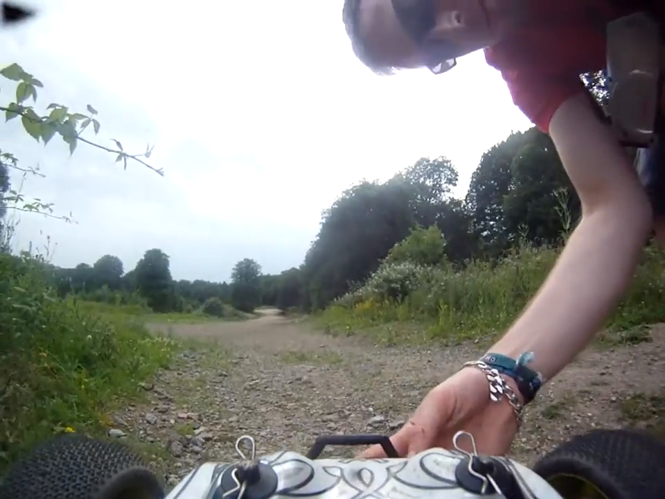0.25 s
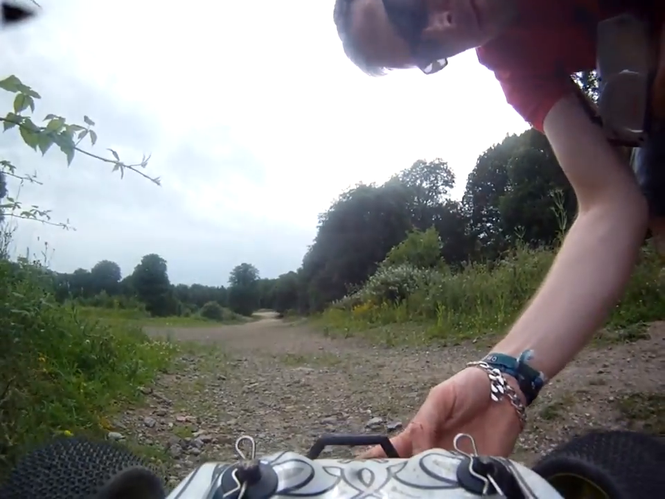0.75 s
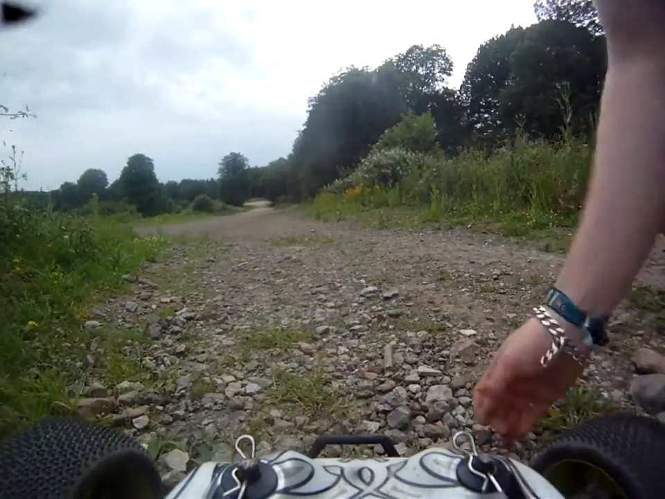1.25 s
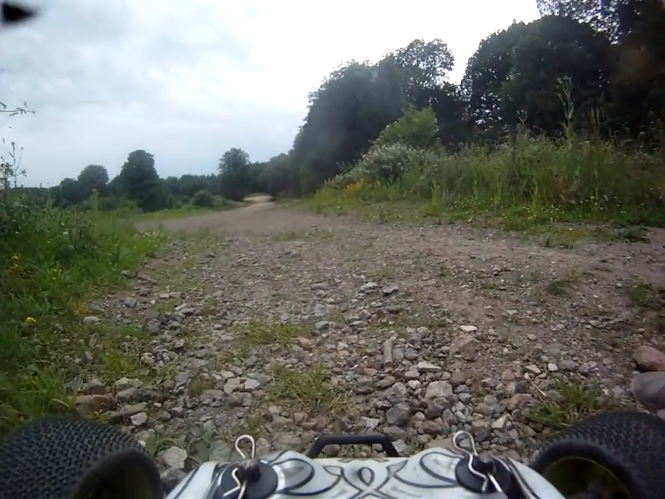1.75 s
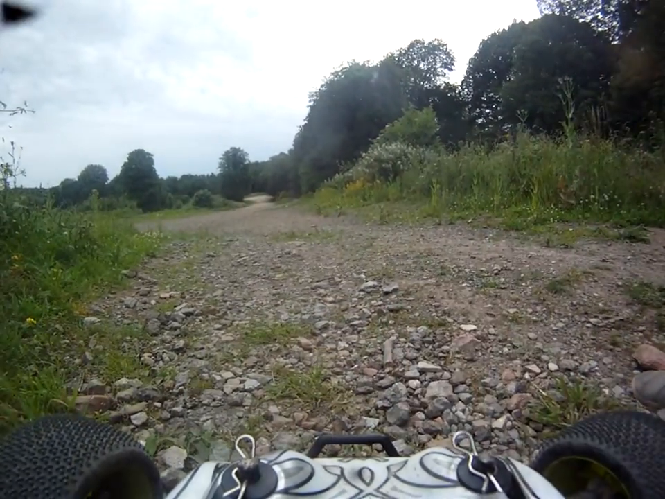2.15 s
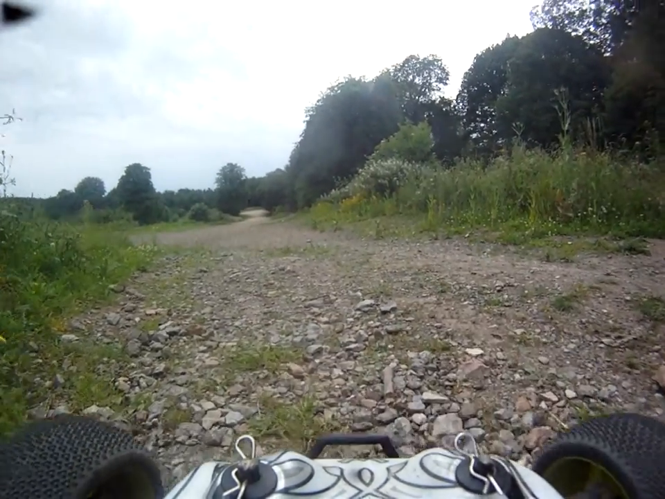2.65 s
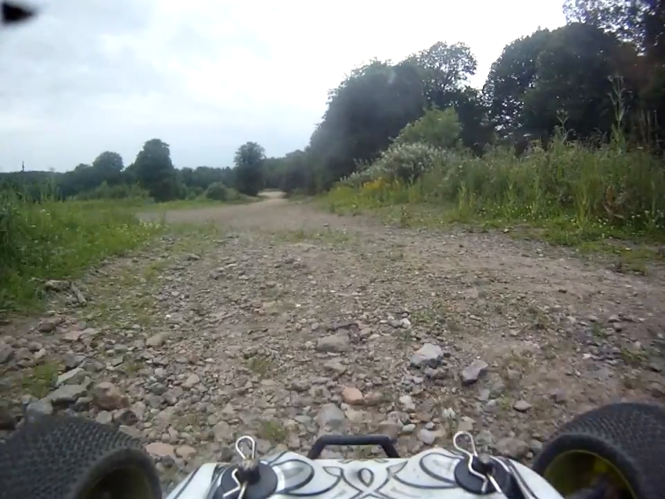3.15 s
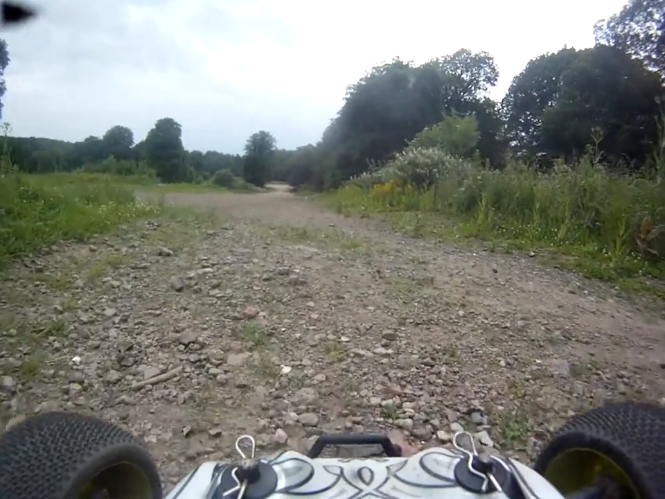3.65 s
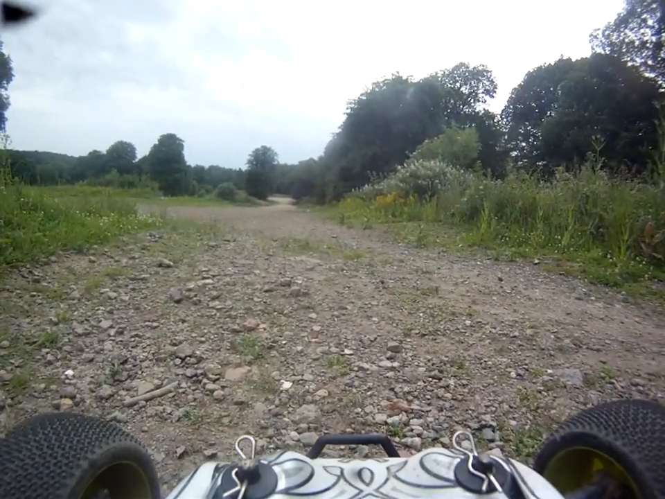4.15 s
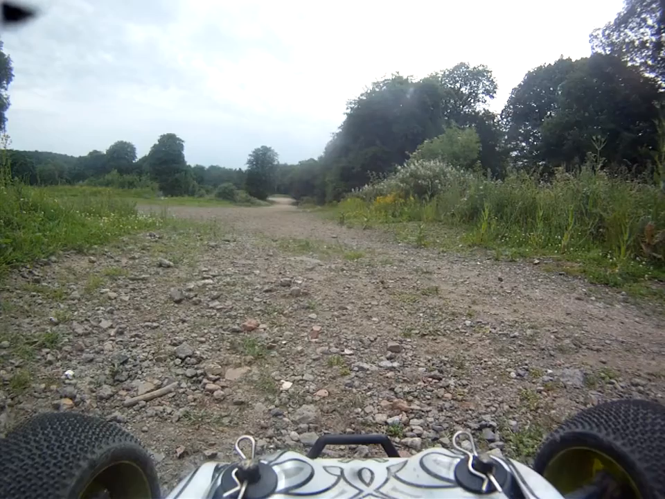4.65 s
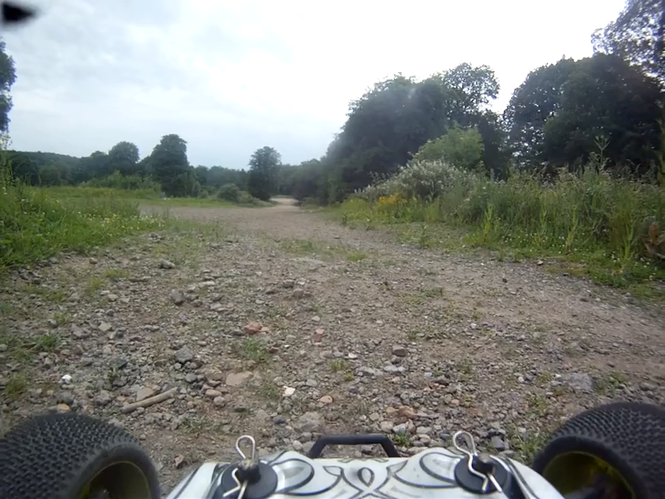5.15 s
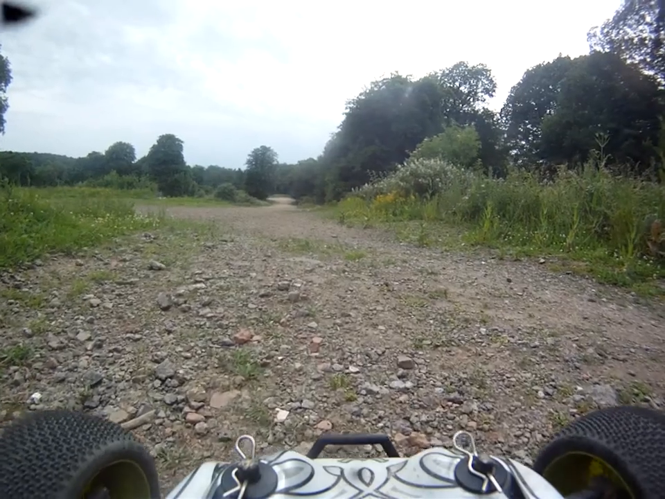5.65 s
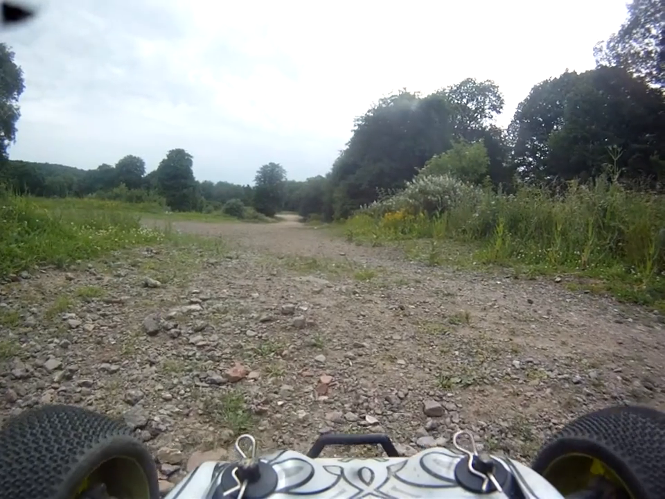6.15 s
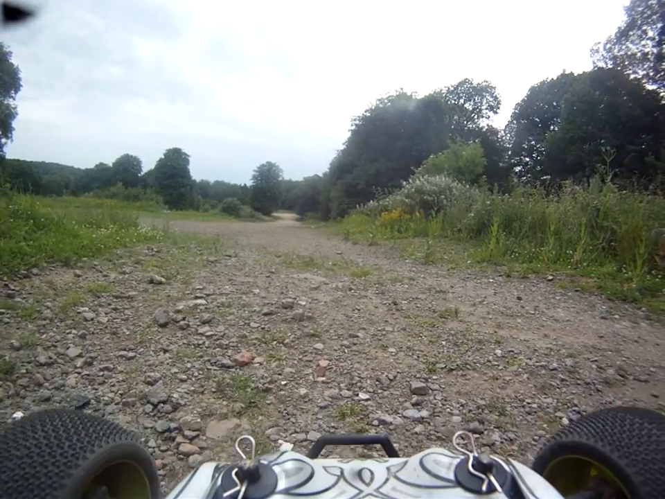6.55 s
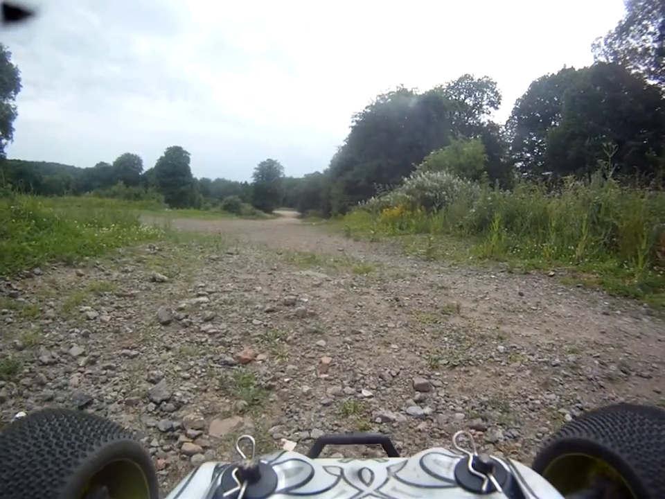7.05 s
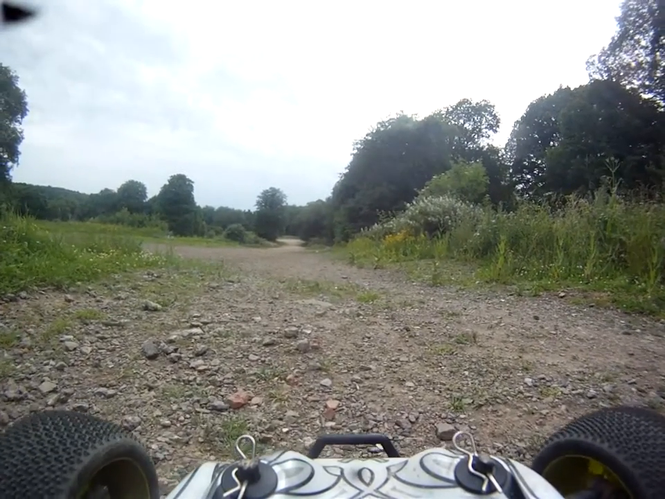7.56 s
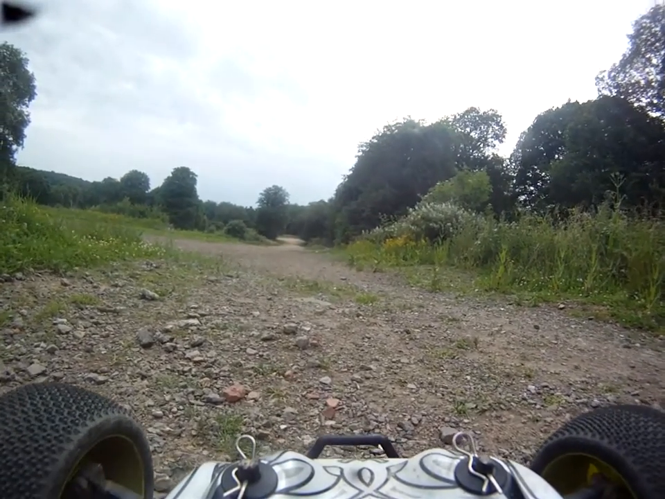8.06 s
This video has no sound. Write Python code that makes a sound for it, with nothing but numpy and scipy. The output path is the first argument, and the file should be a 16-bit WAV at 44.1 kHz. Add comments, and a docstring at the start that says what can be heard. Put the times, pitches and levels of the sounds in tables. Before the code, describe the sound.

A tiny two-stroke engine idles unevenly up close, its firings thudding over a rattling buzz. It revs briefly and stalls with a loud knock. The model buggy then rolls over gravel with a burst of crunching, quietens almost to nothing while a motor drones faintly far off, and later knocks and bumps over stones again. The microphone rides on the buggy in a closed case, so everything sounds muffled and boxy outdoors.

```python
"""A small two-stroke buzzes at idle, blips and stalls with a loud knock; gravel then crunches and knocks.
The engine is a crank-driven sine with rattling noise; gravel is grainy noise, knocks and scrapes in the case.
The microphone rides on the model buggy, in a camera in a closed case: engine, tyres and frame are close.
The chassis shudders and thumps in its low modes, and the camera mount sways as a decaying low sine.
Far off, a motor drones in a few thin partials."""
import sys
import numpy as np
from scipy import signal
from scipy.io import wavfile
from scipy.ndimage import uniform_filter1d

SR = 44100
rng = np.random.default_rng(int(sys.argv[2]) if len(sys.argv) > 2 else 0)


def wav_out(sig):
    """Save sig, one row per channel (or a flat mono array), as 16-bit PCM at SR to the path in sys.argv[1]."""
    wavfile.write(sys.argv[1], SR, np.round(np.clip(np.atleast_2d(sig).T, -1, 1) * 32767).astype(np.int16))


def level_to_linear(level):
    """Convert decibel levels to linear amplitude factors, elementwise."""
    exponent = np.asarray(level, float) / 20
    return 10 ** exponent


N = 366471
TIME = np.arange(N) / SR  # [s]

# Engine run: (time [s], crank speed before surges [Hz], steady shake [dB], rattle [dB])
ENGINE_RUN = [(0, 109, -25, -18), (.4, 103, -25, -17.5), (1.2, 102, -25, -18.5), (2.1, 102, -25, -18.5),
              (2.58, 103, -25, -19), (2.635, 128, -20, -17), (2.665, 185, -22, -15), (2.71, 188, -27, -14),
              (2.76, 170, -14, -15.5), (2.87, 148, -15, -17), (2.9, 125, -19, -20), (2.93, 109, -15, -21),
              (2.955, 98, -28, -25)]
# Overtones of the shake: (multiple of crank speed, level against the first at a 105 Hz crank [dB])
SHAKE_OVERTONES = [(2, -31), (3, -35), (4, -39)]
# Strongest firings at idle: (time [s], peak shake [dB])
STRONG_FIRINGS = [(0.012, -10), (.118, -7.5), (0.205, -8.5), (.343, -8.5), (.415, -6.5), (0.58, -9),
                  (.666, -8.5), (.764, -8), (1.022, -8.5), (1.097, -9), (1.219, -7.5), (1.348, -9),
                  (1.449, -8.5), (1.593, -9), (1.727, -8), (1.8, -7.5), (1.91, -8.5), (2.006, -7.5),
                  (2.116, -9), (2.249, -9), (2.35, -9.5), (2.428, -8.5), (2.481, -9), (2.535, -8),
                  (2.641, -11)]
FIRING_GAP_S, FIRING_JITTER_S = .035, .006  # ordinary firings: usual wait, timing scatter
FIRING_DB, FIRING_SCATTER_DB = -11, 2
# Resonances of the closed case: (centre [Hz], width [Hz], gain [dB], crank turn of the loudest rattle [turns])
CASE_MODES = [(724.7, 31, 0.5, 0.47), (809.3, 149, 3.5, 1), (1080, 123, 4, 0.053), (1159.7, 170, 5.5, 0.14),
              (1429, 372, 2, 0.13), (1644, 325, 2.5, 0.76), (1980, 156, 5.5, 0.45), (2210, 171, 6, 0.8),
              (1500, 167, -11, 0.99), (2860, 420, -16.5, 1), (3560, 240, -9.5, 0.65),
              (4970, 150, -23.5, 0.89), (5135, 960, -21.5, 0.87)]
CASE_LEAK_HZ, CASE_LEAK_WIDTH_HZ, CASE_LEAK_DB = 384, 356, -11.5  # broad low leak
CASE_TREBLE_DB = -18.5  # taken off the treble column of the knocks
# Low modes of the frame: (centre [Hz], width [Hz], gain [dB])
CHASSIS_MODES = [(64.5, 22, 7.5), (110.2, 41, 11.5), (189, 190, -60), (460, 80, -26.5)]
# Rolling on gravel: (time [s], crunch [dB], crunch treble [dB], chassis shudder [dB])
ROLLING = [(2.97, -51, -80, -46), (3.21, -33, -52, -37.5), (3.43, -25.5, -48, -24.5),
           (3.71, -37.5, -63, -32.5), (4.04, -50.5, -65.5, -46.5), (4.26, -63, -64, -58),
           (4.77, -55, -61.5, -61), (5.02, -51.5, -57.5, -51.5), (5.29, -48, -64, -50),
           (5.63, -42.5, -57.5, -46), (5.93, -37, -64, -31.5), (6.06, -37, -56, -38.5),
           (6.26, -41.5, -54.5, -45), (6.49, -39, -51.5, -47), (6.75, -39, -53, -42.5),
           (6.9, -35, -47, -28.5), (7.06, -43, -66, -37.5), (7.36, -41, -73, -33), (7.59, -32, -48, -34.5),
           (7.83, -35.5, -46, -38), (8.03, -42.5, -59, -52), (8.31, -34.5, -53, -34)]
TREAD_HZ, TREAD_WIDTH_HZ, TREAD_DB = 450, 480, -15  # dull tyre patter, against the crunch
JUDDER_HZ, JUDDER_WIDTH_HZ, JUDDER_DB = 42, 32, -7  # suspension, against the shudder
RING_DB = -8  # main frame mode, against the shudder
RING_WANDER_DB, RING_WANDER_HZ = 5, 7.8  # dB per unit of a random curve, new values of it per second
# Knocks, the first as the engine stalls, the others from stones: (time [s], peak of the buzz [dB], colour [Hz],
# decay T60, held within 0.008 to 0.2 [s], treble gain before CASE_TREBLE_DB is taken off [dB])
KNOCK_LIST = [(2.958, 12.5, 1080, 0.023, -9), (3.2, -20, 980, .11, -30), (3.304, -22, 1480, 0.053, -27),
              (3.412, -10.5, 1520, 0.03, -39), (3.5, -6.5, 1530, 0.03, -1.5), (3.691, -21, 816, 0.059, -34),
              (3.817, -10, 1180, 0.14, -29), (4.011, -30, 1240, 0.064, -33), (4.9, -31, 1080, 0.13, -12),
              (5.037, -30.5, 1940, .08, -12), (5.741, 7.5, 1770, 0.0099, -22),
              (5.914, -24, 1270, 0.067, -31), (5.959, -3.5, 1640, 0.044, -17.5),
              (6.061, -15, 1560, 0.026, -32), (6.107, -9.5, 1630, 0.069, -17),
              (6.136, -14, 2600, 0.24, -24), (6.321, -28.5, 1100, 0.064, 6), (6.834, -3.5, 1960, 0.05, -11),
              (6.872, -7, 2060, .047, -20), (6.908, -22.5, 1070, 0.058, -33),
              (6.962, -16.5, 980, 0.12, -18.5), (7.007, -4.5, 1820, .074, -51),
              (7.029, -18, 1900, 0.045, -2), (7.078, -24.5, 1780, 0.072, -29), (7.254, 9, 1080, 0.02, -13),
              (7.383, -8.5, 1330, 0.1, -16), (7.392, 1.5, 2210, 0.03, -39), (7.473, -5, 2400, 0.082, -23.5),
              (7.494, -7, 1055, 0.09, -17), (7.527, 6, 1880, 0.0095, -23), (7.563, -8, 1920, 0.033, -24),
              (7.654, -19, 1120, 0.18, -21), (7.728, -3.5, 2270, 0.049, -10.5),
              (7.801, -22, 1120, 0.042, -25), (7.883, -22.5, 2280, 0.075, -11),
              (8.034, -12, 1656, 0.089, -15), (8.169, -27, 2210, 0.067, -25.5), (8.29, -9, 1670, 0.13, -16)]
KNOCK_THUMP_DB = -29.5  # push on the frame, against the knock
SHELL_HZ, SHELL_T60_S, SHELL_DB = 444, 0.063, -25.5  # body shell note, against the knock
SHELL_GROWS = 0.31  # extra dB per dB of knock
FRAME_RING_HZ, FRAME_RING_T60_S, FRAME_RING_DB = 120, 0.49, -32  # level after a 0 dB knock
FRAME_RING_GROWS = 0.56  # dB per dB of knock
# Stones scraping along the frame: (centre time [s], length [s], level [dB], colour [Hz], treble gain [dB])
STONE_SCRAPES = [(2.974, 0.086, -26, 1500, -1.5), (3.315, 0.066, -26.5, 1550, 0),
                 (3.439, 0.022, -22.5, 1500, -5), (3.546, 0.07, -19.5, 1870, 2),
                 (3.649, 0.027, -28.5, 1220, 2), (3.889, 0.053, -37.5, 2020, 10),
                 (4.263, 0.055, -38.5, 2200, 1.5), (4.43, 0.052, -50, 2100, 5),
                 (4.779, 0.028, -46.5, 2000, -1), (5.056, .03, -44, 1950, 4),
                 (5.133, 0.13, -43.5, 1690, -10), (5.503, 0.1, -42, 2100, 14),
                 (5.76, 0.035, -18, 1880, -31), (5.972, 0.03, -30, 1870, -17),
                 (6.243, 0.04, -33.5, 2200, 3), (6.819, 0.075, -26.5, 2040, 9),
                 (6.969, 0.025, -23.5, 1900, 6), (7.033, 0.021, -24, 2010, 10),
                 (7.271, 0.033, -25.5, 2200, -6), (7.517, 0.025, -23, 1960, 3),
                 (7.595, 0.059, -23, 1980, 8.5), (7.67, 0.067, -40, 2200, 18), (7.948, 0.1, -31, 1045, -1),
                 (8.221, 0.08, -25, 1990, 2)]
# Wheels dropping over stones: (time [s], peak frame thump [dB], mount sway before rise and decay [dB], sway [Hz])
WHEEL_BUMPS = [(2.66, -50, -27, 29.23), (2.82, -50, -29, 31.3), (3.039, -37, -28, 26.8),
               (3.199, -21, -14.5, 25), (3.302, -17.5, -12.5, 25.1), (3.412, -29, -20.5, 24.8),
               (3.528, -22, -9.5, 25), (3.693, -23, -12, 26.4), (3.817, -17.5, -18.5, 26.1),
               (4.011, -43.5, -27.5, 26.1), (5.036, -39, -31, 26.2), (5.53, -55, -35.5, 25.8),
               (5.742, -23, -33, 25.6), (5.915, -36, -26, 26.9), (6.06, -24, -23.5, 27.8),
               (6.108, -19, -15, 26.8), (6.479, -43, -26, 26.9), (6.68, -47, -25, 24.84),
               (6.832, -14.5, -30, 24.86), (6.872, -6, -20, 25.2), (6.91, -19, -26, 25.1),
               (7.028, -18.5, -25.5, 24.75), (7.12, -42, -27, 27.6), (7.254, -16, -26.5, 27.6),
               (7.391, -13, -26, 27.6), (7.473, -22, -24, 27.1), (7.494, -15.5, -27, 27.4),
               (7.68, -45, -28, 27.7), (7.8, -20.5, -29, 27.8), (7.93, -45, -28, 28.3),
               (8.036, -3.5, -20.5, 27.1), (8.169, -31, -24, 26.5)]
SWAY_RISE_S, SWAY_T60_S = 0.017, 1
# Far drone: (time [s], pitch [Hz], level before the partials' own [dB])
FAR_DRONE = [(4.05, 134, -68), (4.15, 132, -58), (4.5, 134.5, -56), (4.72, 131.3, -58), (4.9, 135, -57),
             (5.1, 142.5, -54), (5.25, 133, -58), (5.7, 134, -56), (6.25, 139, -52), (6.75, 132, -52),
             (6.85, 131, -62)]
# Partials of the drone: (multiple of pitch, level [dB])
DRONE_PARTIALS = [(1, -9), (4, -16), (5, -14), (6, -12), (7, -17), (8, -.5), (9, -4), (10, -7)]


def unit(x):
    """Scale to rms 1."""
    return x / np.sqrt(np.mean(x ** 2))


def curves(table):
    """Columns of a table at every sample, and a gate that is open while the table runs."""
    times, *columns = np.transpose(table)
    running = (TIME >= times[0]) & (TIME <= times[-1])
    gate = uniform_filter1d(1. * running, size=200)
    return [np.interp(TIME, times, column) for column in columns] + [gate]


def ring(x, hz, width):
    """One resonance, gain 1 at its centre."""
    return signal.lfilter(*signal.iirpeak(hz, hz / width, SR), x)


def steep(x, hz, width):
    """A resonance applied twice: dark skirts."""
    return ring(ring(x, hz, width), hz, width)


def decaying(pulses, length_s):
    """Each pulse dies away exponentially."""
    return signal.lfilter([1], [1, -np.exp(-1 / (length_s * SR))], pulses)


def grit(rate, spread_db, length_s):
    """Noise whose level jumps with scattered grains (rate per second) of very uneven size."""
    sizes = level_to_linear(spread_db * np.minimum(rng.exponential(size=N), 4))
    grains = (rng.random(N) < rate / SR) * sizes
    return rng.standard_normal(N) * decaying(grains, length_s)


def case(x, treble_db=0, colour_hz=1500, colour_db=0, low_db=0):
    """The camera case rings in its modes; a blow can favour those near its colour."""
    out = level_to_linear(CASE_LEAK_DB + low_db) * ring(x, CASE_LEAK_HZ, CASE_LEAK_WIDTH_HZ)
    for hz, width, db, _ in CASE_MODES:
        near = np.exp(-(np.log(hz / colour_hz) / .2) ** 2)
        gain_db = db + colour_db * near + treble_db * (hz > 2700)
        out = out + level_to_linear(gain_db) * steep(x, hz, width)
    return out


def chassis(x):
    """Low modes of the frame."""
    return sum(level_to_linear(db) * ring(x, hz, width) for hz, width, db in CHASSIS_MODES)


def thump():
    """One soft push through the frame, peak 1."""
    push = -chassis(np.exp(-((TIME[:5000] - .004) / 0.001) ** 2))
    return push / np.abs(push).max()


def firings():
    """The strong firings, with ordinary ones of chance size three or four turns apart between them."""
    rows = list(STRONG_FIRINGS)
    chance = rng.standard_normal((len(rows), 12, 2))
    for (start, _), (end, _), draws in zip(STRONG_FIRINGS, STRONG_FIRINGS[1:], chance):
        count = round((end - start) / FIRING_GAP_S)
        for k in range(1, count):
            time = start + (end - start) * k / count + FIRING_JITTER_S * draws[k, 0]
            rows.append((time, FIRING_DB - FIRING_SCATTER_DB * np.clip(draws[k, 1], -1, 3)))
    return rows


def engine():
    """Each good firing, one every few turns, speeds the crank and shakes the frame; loose parts rattle."""
    speed_hz, shake_db, rattle_db, gate = curves(ENGINE_RUN)
    kick = np.max([level_to_linear(db) * np.exp(-((TIME - s) / .016) ** 2) for s, db in firings()], axis=0)
    idling = TIME < STRONG_FIRINGS[-1][0] + .014
    surge = (kick - .2) * idling
    # the crank labours against compression just before it fires
    drag = np.exp(-(kick + .04) / .07) * idling
    waver = unit(ring(rng.standard_normal(N), 30, 40))
    turn = np.cumsum(speed_hz * (1 + 1.1 * surge - .5 * drag + 0.023 * waver)) / SR

    harsh = (speed_hz / 105) ** 3  # overtones grow with speed
    overtones = sum(level_to_linear(db) * np.sin(2 * np.pi * k * turn) for k, db in SHAKE_OVERTONES)
    steady = np.sqrt(2) * level_to_linear(shake_db) * (1 + 0.33 * waver)
    shake = (np.sin(2 * np.pi * turn) + harsh * overtones) * np.hypot(kick, steady)
    # the springs soak up the slowest motion
    shake = signal.sosfilt(signal.butter(2, 70, "high", fs=SR, output="sos"), shake)

    # a sharp tick as the pressure of a firing starts to climb, and one of chance size on every turn
    climb_starts = np.maximum(np.diff(1. * (np.gradient(kick) > 0), prepend=0), 0)
    onset = climb_starts * np.exp(-kick / 0.094)
    stroke = np.diff(np.floor(turn + .4), prepend=0) * 2 * rng.random(N)
    ticks = decaying(3.5 * onset + 1.6 * stroke, .002)
    clatter = 0.21 * unit(grit(600, 4.3, 0.0047)) + rng.standard_normal(N) * (1.03 + ticks)
    rattle = level_to_linear(CASE_LEAK_DB) * ring(clatter, CASE_LEAK_HZ, CASE_LEAK_WIDTH_HZ)
    for hz, width, db, peak in CASE_MODES:
        once_a_turn = 1 + 0.41 * np.cos(2 * np.pi * (turn - peak))
        rattle = rattle + level_to_linear(db) * steep(clatter * once_a_turn, hz, width)
    rumble = level_to_linear(-37) * unit(ring(rng.standard_normal(N), 60, 70))
    return gate * (shake + level_to_linear(rattle_db) * unit(rattle) + rumble)


def rolling():
    """Tyres crush gravel in small grains, duller or brighter; the frame shudders and its main mode rings."""
    crunch_db, treble_db, shudder_db, gate = curves(ROLLING)
    step = int(SR / RING_WANDER_HZ)
    wander = uniform_filter1d(np.repeat(rng.standard_normal(200), step), step)[:N]
    ring_db = shudder_db + RING_DB + RING_WANDER_DB * wander
    crunch = case(1.08 * unit(grit(240, 4.3, 0.0071)) + rng.standard_normal(N))
    treble = signal.sosfiltfilt(signal.butter(4, 2700, "high", fs=SR, output="sos"), crunch)
    shudder = unit(chassis(grit(200, 6.3, 0.0065)))
    hum = unit(steep(rng.standard_normal(N), CHASSIS_MODES[1][0], 21))
    tread = level_to_linear(TREAD_DB) * unit(steep(grit(150, 1.3, 0.015), TREAD_HZ, TREAD_WIDTH_HZ))
    judder = level_to_linear(JUDDER_DB) * unit(steep(rng.standard_normal(N), JUDDER_HZ, JUDDER_WIDTH_HZ))
    gravel = level_to_linear(crunch_db) * (unit(crunch - treble) + tread) + level_to_linear(treble_db) * unit(treble)
    frame = level_to_linear(shudder_db) * (shudder + judder) + level_to_linear(ring_db) * hum
    return gate * (gravel + frame)


def knocks():
    """Each knock is a bright tick, a short buzz of the case, a shell note and a push that rings the frame."""
    out, t, after = np.zeros(N + SR), TIME[:5000], TIME[:20000]
    noise = rng.standard_normal((len(KNOCK_LIST), 2 * len(t)))
    push = level_to_linear(KNOCK_THUMP_DB) * thump()
    for (s, db, hz, t60, treble_db), hiss in zip(KNOCK_LIST, noise):
        # the second half of the buzz is used, once the case is ringing
        buzz = unit(case(hiss, treble_db - CASE_TREBLE_DB, hz, colour_db=5, low_db=5)[len(t):])
        # small random steps roughen the level of the buzz
        roughness = uniform_filter1d(level_to_linear(1.83 * np.repeat(hiss[:50], len(t) // 50)), size=40)
        decay = np.exp(-np.log(1000) * t / np.clip(t60, .008, .2))
        crack = buzz * roughness * decay * np.minimum(t / 0.00084, 1)
        tick = level_to_linear(-13) * hiss[:len(t)] * np.exp(-t / 0.0008)
        shell_hz = SHELL_HZ * (1 + 0.078 * hiss[60])
        shell = np.sin(2 * np.pi * shell_hz * t) * level_to_linear(SHELL_DB + SHELL_GROWS * db - 60 * t / SHELL_T60_S)
        at = int(s * SR)
        out[at:at + len(t)] += level_to_linear(db) * (crack / np.abs(crack).max() + tick + shell + push)

        ring_hz = FRAME_RING_HZ * (1 + .04 * hiss[70])
        note = np.sin(2 * np.pi * ring_hz * after) * np.minimum(after / 0.017, 1)
        ring_db = FRAME_RING_GROWS * db + FRAME_RING_DB - 60 * after / FRAME_RING_T60_S
        out[at:at + len(after)] += level_to_linear(ring_db) * note
    return out[:N]


def scrapes():
    """Stones rub along the frame: short gritty noise in the case that swells and fades."""
    out, t = np.zeros(N + SR), TIME[:12000] - TIME[6000]
    rub = unit(grit(340, 1.37, 0.0024)) + .5 * rng.standard_normal(N)
    for s, length, db, hz, treble_db in STONE_SCRAPES:
        at = int(s * SR) - len(t) // 2
        buzz = unit(case(np.resize(rub[at:], len(t)), treble_db, hz, colour_db=4))
        out[at:at + len(t)] += level_to_linear(db) * buzz * np.exp(-(2 * t / length) ** 6)
    return out[:N]


def bumps():
    """The frame thumps as a wheel drops."""
    out, push = np.zeros(N + SR), thump()
    for s, thump_db, _, _ in WHEEL_BUMPS:
        at = int(s * SR)
        out[at:at + len(push)] += level_to_linear(thump_db) * push
    return out[:N]


def mount():
    """Each bump knocks the camera out of its swing and starts a new sway that dies away."""
    s, _, sway_db, sway_hz = np.transpose(WHEEL_BUMPS)
    last = np.maximum(np.searchsorted(s, TIME) - 1, 0)
    since = np.maximum(TIME - s[last], 0)
    rise = 1 - np.exp(-(since / SWAY_RISE_S) ** 2)
    swing = uniform_filter1d(level_to_linear(sway_db[last] - 60 * since / SWAY_T60_S) * rise, size=600)
    return np.sqrt(2) * swing * np.sin(2 * np.pi * np.cumsum(sway_hz[last]) / SR)


def drone():
    """A distant motor: a few thin partials of one gliding pitch."""
    pitch_hz, level_db, gate = curves(FAR_DRONE)
    turn = np.cumsum(pitch_hz) / SR
    partials = sum(level_to_linear(db) * np.sin(2 * np.pi * k * turn) for k, db in DRONE_PARTIALS)
    return gate * level_to_linear(level_db) * np.sqrt(2) * partials


def scene():
    """All sources, near and far, in the one microphone."""
    near = engine() + mount() + bumps() + rolling() + knocks() + scrapes()
    return (near + drone())[None]


def roll_off(x):
    """The treble ends steeply here."""
    return signal.sosfilt(signal.butter(12, 15680, fs=SR, output="sos"), x)


def record(dry):
    """The input clips; the converter samples at 12 kHz and holds each value, mirroring the spectrum upward."""
    x = np.clip(dry, -.95, .95)
    x = signal.sosfiltfilt(signal.butter(6, 5500, fs=SR, output="sos"), x)
    sampled = signal.resample_poly(x, 40, 147, axis=1)  # 12 kHz
    held = np.repeat(sampled, 4, axis=1)  # 48 kHz
    x = signal.resample_poly(held, 147, 160, axis=1)[:, :N]  # back to SR
    mix = np.pad(x, ((0, 0), (0, N - x.shape[1])))
    return roll_off(mix)


dry = scene()
out = record(dry)
wav_out(out)
```